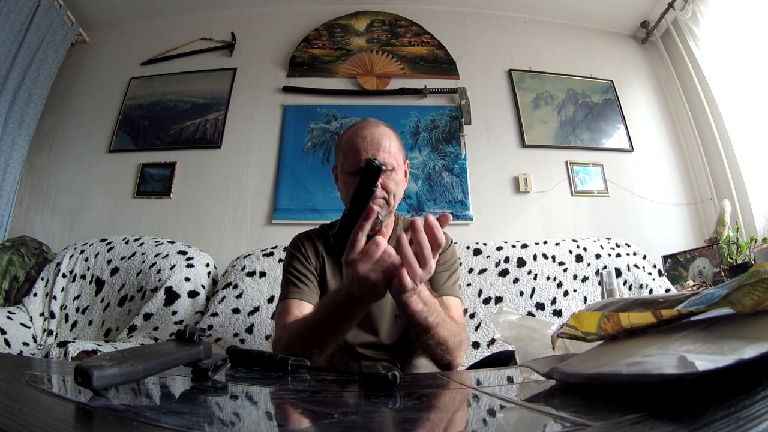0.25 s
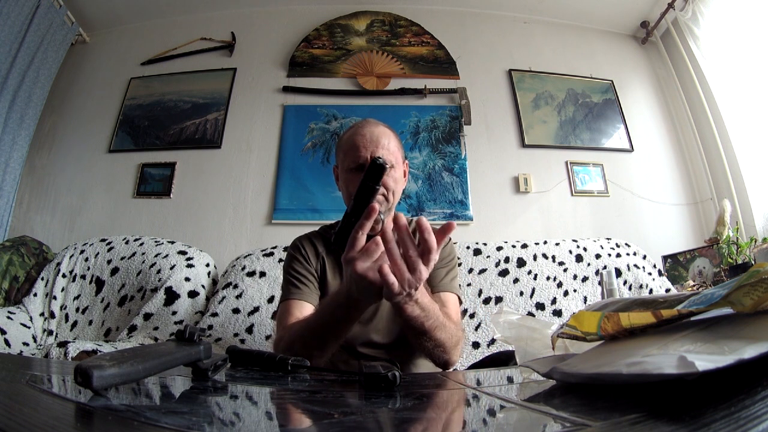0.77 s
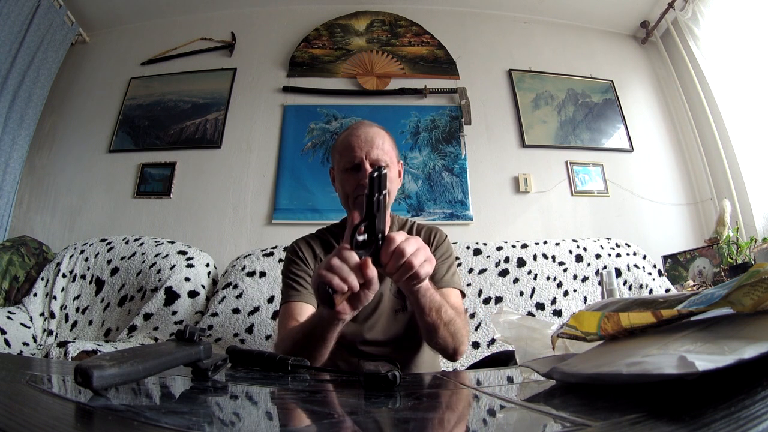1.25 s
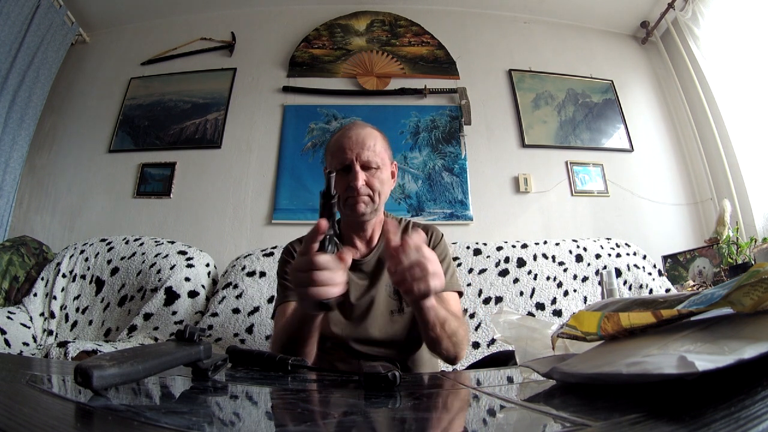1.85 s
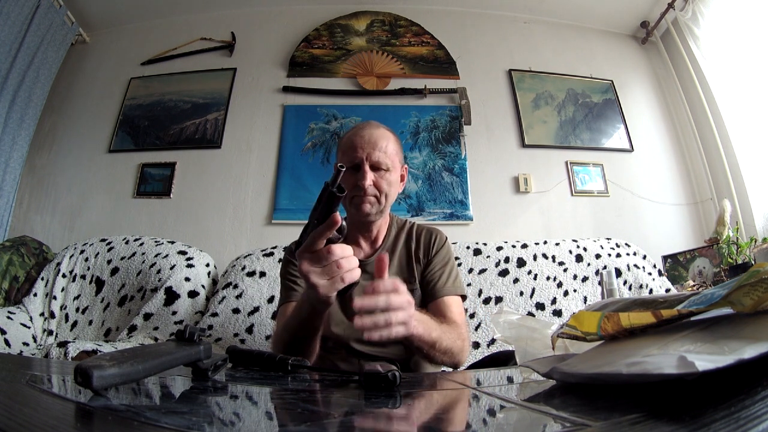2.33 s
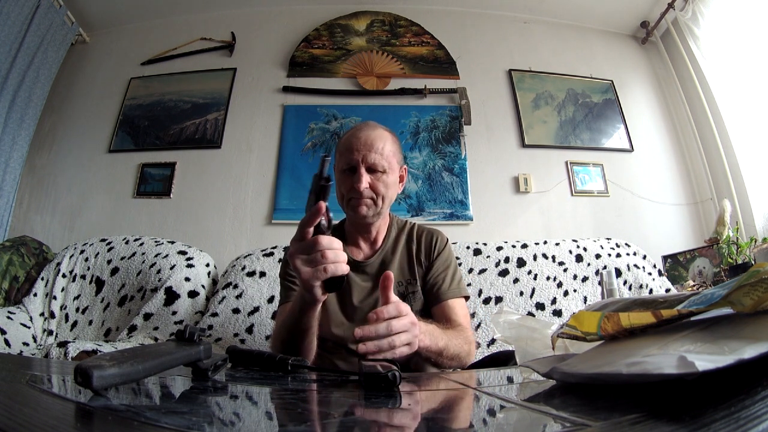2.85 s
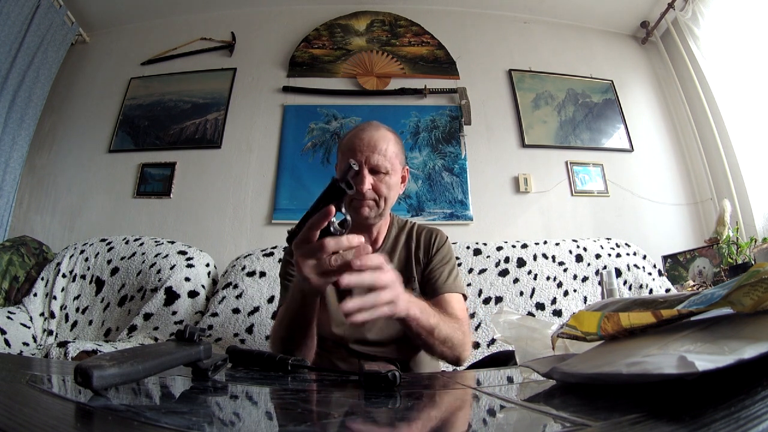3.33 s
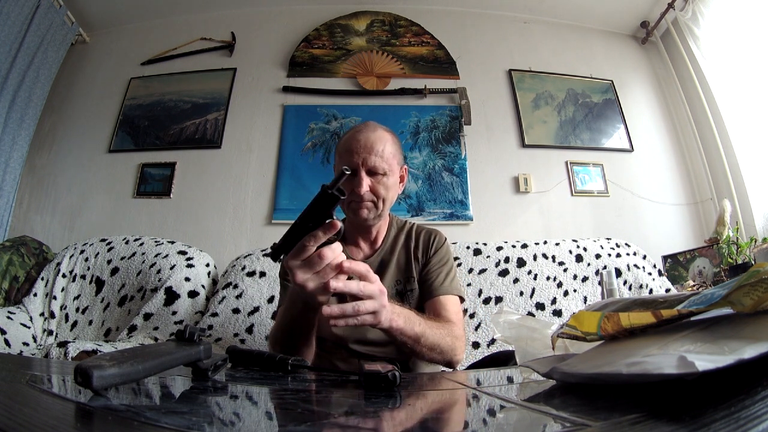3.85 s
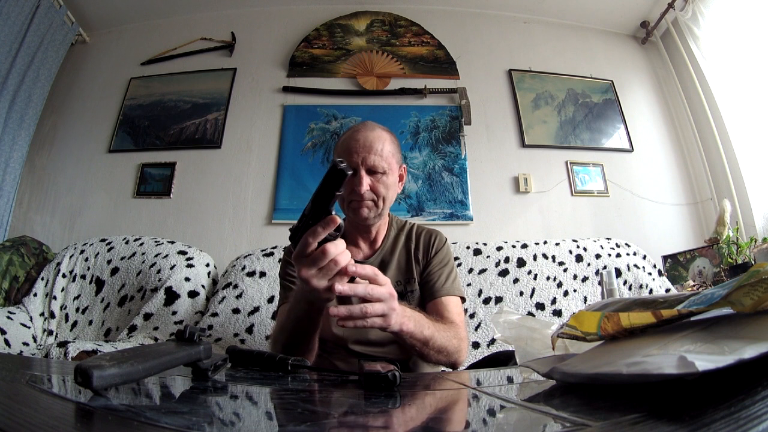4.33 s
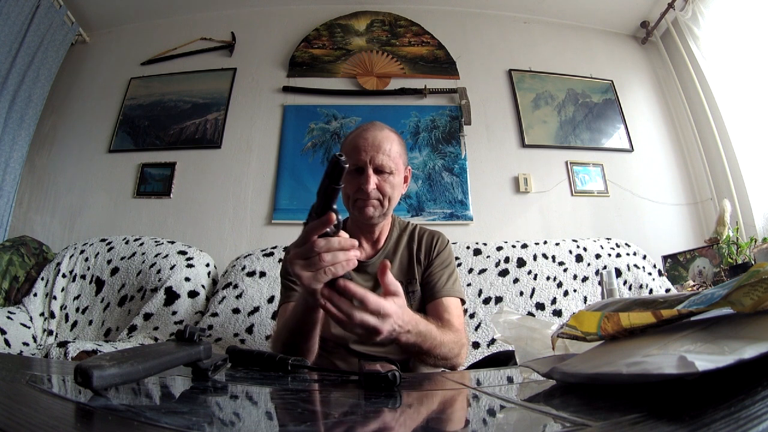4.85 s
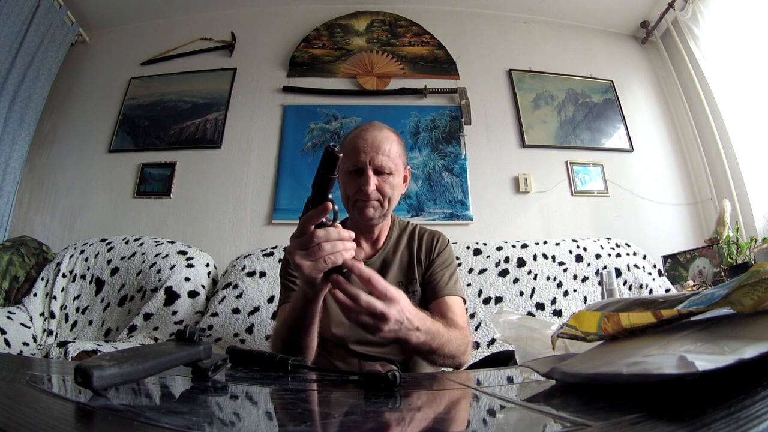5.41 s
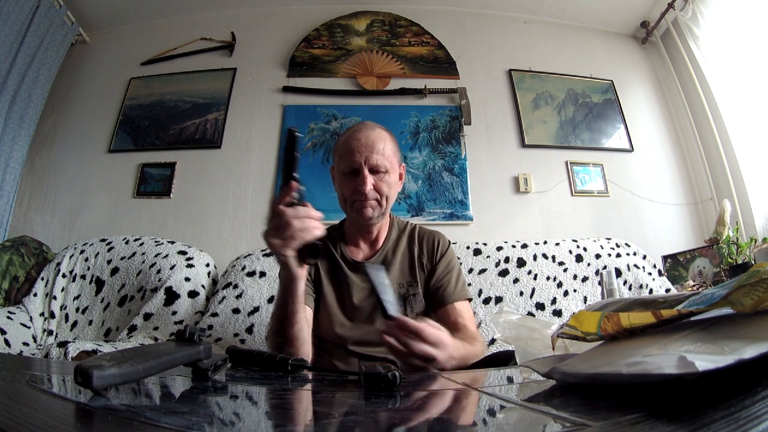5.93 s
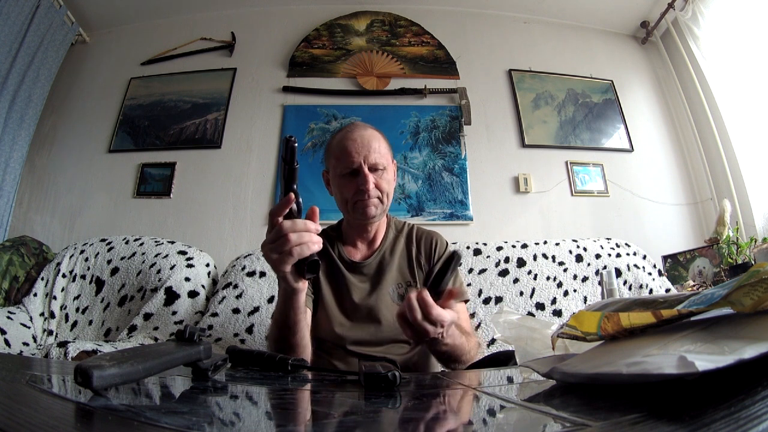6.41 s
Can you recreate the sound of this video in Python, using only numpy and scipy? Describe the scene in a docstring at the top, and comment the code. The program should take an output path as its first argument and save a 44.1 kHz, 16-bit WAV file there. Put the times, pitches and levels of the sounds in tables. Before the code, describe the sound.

Indoors in a furnished room, close to a microphone on a table, low rumble and soft hiss run throughout. Loose metal parts tick at 0.1 seconds, then a pistol slide slams at 0.2 with a bright, very short steel clack. At 0.6 a brief scrape and double click follow, much softer. Sparse faint ticks lead to a cluster at 1.55 to 1.7: scraping, small clicks and a very hard snap that overloads with a dull thump. From about 1.8 to 4 it is nearly quiet, with tiny ticks and a barely audible thin whistle at 3.1. At 4.06 a short scrape runs into another violent, distorted double slam. A light scrape and click come at 5.15. From 5.7 to 6.05 the magazine knocks, slides and clicks softly in its hollow well, then only hiss remains. Loud blows leave a short room tail.

```python
"""Furnished living room; a pistol worked by hand about a metre from a two-port microphone on a table.
Hiss, rumble and a steady offset lie under everything; loose parts tick from the start, as filtered noise and
ringing modes. Slide and action scrape and slam near 0.2, 0.6, 1.6, 4.1 and 5.2 s: contacts ring the damped steel.
A faint whistle, a plain sine, comes at 3.1 s; from 5.7 s the magazine knocks and scrapes in its hollow well.
Echoes and a diffuse tail answer each sound; the hardest blows overload the input, with clipping and a thump."""
import sys
import numpy as np
from scipy import signal
from scipy.io import wavfile

SR = 44100
rng = np.random.default_rng(int(sys.argv[2]) if len(sys.argv) > 2 else 0)


def output_pcm(signal):
    """Save a mono or channel-first signal as 16-bit PCM at the path in sys.argv[1].

    Samples are clipped to [-1, 1] before scaling.
    """
    pcm = np.clip(np.atleast_2d(signal).T, -1, 1) * 32767
    wavfile.write(sys.argv[1], SR, np.round(pcm).astype(np.int16))


N = 294091

# Background spectrum, only its shape: [f/Hz, relative density level/dB]
HISS_SPECTRUM = [(18, -32.5), (30, 1.5), (32, -4.5), (53, 0.5), (224, -3.5), (307, -5), (341, -5.5),
                 (638, -10), (2480, -20.5), (2980, -14), (3680, -23.5), (14300, -27.5), (15500, -37)]
# Difference between the ports in that background: [f/Hz, side relative to mid level/dB]
HISS_SIDE_LEVELS = [(60, -3.5), (130, -19.5), (290, -20), (640, -17.5), (1410, -14), (3100, -4.5),
                    (6820, -1), (15000, -2.5)]
# Loose parts tick as the hands shift the pistol: [t/s, middle-mode peak level/dB, strongest ring f/Hz]
LOOSE_TICKS = [(.090, -26.5, 2354), (0.133, -30.5, 3276), (0.449, -38, 1510), (1.016, -35.5, 1880),
               (1.233, -49.5, 2083), (1.289, -46, 2197), (1.501, -33, 2270), (1.535, -42, 2090),
               (1.577, -23, 2230), (1.709, -25.5, 2690), (2.815, -49.5, 2580), (2.939, -54, 1800),
               (3.179, -49.5, 1800), (3.199, -50.5, 1860), (3.219, -56.5, 1867), (3.429, -54, 1296),
               (3.614, -48.5, 1300), (3.672, -41.5, 1870), (3.73, -39, 1860), (3.846, -50.5, 1208),
               (5.132, -36, 1462)]
# Parts of the action strike each other: [t/s, middle-mode peak level/dB, strongest ring f/Hz,
# treble relative to middle level/dB, low relative to middle level/dB]
ACTION_BLOWS = [(.159, -23.5, 3270, -23.5, -5), (.179, 0.5, 2280, -28.5, -24), (.185, -8, 2900, -19.5, -25),
                (.192, -12, 3050, -32.5, -26), (.1945, 5, 2470, -18, -15), (.591, -13, 4360, -26, -6.5),
                (.599, -13.5, 2160, -27, -8.5), (1.573, -20.5, 3300, -12, -31),
                (1.584, -15.5, 1960, -12, -21.5), (1.5845, -11, 5550, -16, -42),
                (1.607, -19, 4800, -10, -22), (1.618, -16, 2090, -19, -19), (1.628, 9, 2650, -15.5, -20),
                (1.715, -17, 2090, -25, -11), (1.72, -19.5, 4550, -17, -18), (4.059, -16, 3000, -20, -12),
                (4.0725, -17, 2860, -22, -27.5), (4.0805, 9.5, 1930, -10, -23),
                (4.085, 4.5, 3350, -16, -20), (4.093, -0.5, 3210, -12, -16), (5.159, -28.5, 3400, -6, -38)]
# Modes of slide and frame, damped by the hand: [f/Hz, relative level/dB, t60/s]
STEEL_MODES = [(780, -2, 0.0018), (1080, 0.5, 0.0023), (1330, -11, .008), (1654.5, -7, 0.001),
               (1764, -1, 0.0043), (2126, 3.5, 0.0031), (2866, 2.5, 0.0036), (3277, 0, 0.0041),
               (3440, -4.5, 0.0092), (4130, -7, 0.0042), (4740, -7.5, 0.0033), (5790, -13, 0.008),
               (6600, 0.5, 0.0028), (7130, -1, 0.0033), (7970, -2.5, 0.0024), (9490, -5, 0.0059),
               (10607, 0, 0.002), (12200, -5, 0.0021), (12963, -12, 0.0058)]
# First reflections off table, wall and ceiling: [delay t/ms, energy relative to direct level/dB]
FIRST_ECHOES = [(5.5, -18.5), (11.5, -16), (16.0, -19.5)]
# Diffuse tail of the room: [f/Hz, relative level/dB, t60/s]
ROOM_TAIL = [(300, -9.5, 0.38), (730, -10.5, 0.48), (2030, -1, 0.23), (5530, 0, .23), (12000, 6, .2)]
# Difference between the ports in the tail: [f/Hz, side relative to mid level/dB]
ROOM_SIDE_LEVELS = [(300, -15), (1300, -30), (4400, -17), (8100, -16.5), (15000, -19)]
# Slide along its rails: [start t/s, end t/s, first level/dB, last level/dB, strongest ring f/Hz]
RAIL_SCRAPES = [(0.137, 0.185, -39.5, -34.5, 3300), (.589, .603, -21.5, -26, 2760),
                (1.568, 1.628, -40, -39, 2198), (4.057, 4.071, -21, -27, 2498),
                (4.072, 4.082, -24, -21, 2793), (5.14, 5.16, -55, -33.5, 3390),
                (5.158, 5.17, -35.5, -43.5, 3400)]
# One faint thin whistle: [start t/s, end t/s, f/Hz, rms level/dB]
WHISTLE = (3.065, 3.175, 2900, -73)
# Catch and magazine knock on the well: [t/s, peak level/dB, upper modes' extra level/dB]
WELL_KNOCKS = [(5.718, -27.5, -4), (5.748, -45, -10), (5.784, -47.5, 4), (5.841, -25.5, -12),
               (5.888, -34, -17), (5.9, -30.5, -17), (5.916, -28.5, 7), (5.926, -27, 9), (5.936, -35, -6),
               (5.945, -24, 17), (6.038, -46, -2)]
# Modes of the hollow magazine well: [f/Hz, relative level/dB, t60/s]
WELL_MODES = [(1820, 9, 0.016), (2140, 4.5, 0.0073), (2780, 7, 0.0061), (3410, 8.5, 0.011),
              (4100, -16, 0.0056), (5200, -7, 0.0039), (9770, -18, .004)]
# Level curve of the magazine sliding in its well: [t/s, level/dB]
MAGAZINE_LEVELS = [(5.805, -57), (5.823, -49), (5.836, -53), (5.85, -44.5), (5.88, -52.5), (5.914, -39.5),
                   (5.948, -39.5), (5.96, -72)]
# Constant input offset, left then right: [share of full scale]
INPUT_OFFSET = [
    [-.0175],
    [-.0005],
]
# Thump relative to the overload that causes it, left then right: [level/dB]
THUMP_LEVELS = [
    [-15.5],
    [-16.5],
]

HISS_DB = -59   # rms of the mid signal
HISS_TILT_DB = 0.07   # left raised, right lowered by this

LOW_TOP_HZ, TREBLE_START_HZ = 1200, 5800   # edges of the low, middle and treble mode groups
TICK_TREBLE_DB, TICK_LOW_DB = -25, -12.5   # relative to a tick's middle modes
CONTACT_MS, CONTACT_MS_PER_DB = 2.7, 0.406   # the hardest blows, above 0 dB, rattle on longer
FAVOUR_WIDTH, CHANCE_DB = .16, 1.5   # width in natural log of frequency; random spread of each mode
FAVOUR_DB, FAVOUR_PER_DB = 6.5, 0.24   # a softer blow favours the nearest modes more
DULL_PER_DB = 0.25   # and loses this many dB an octave above them for each dB of softness
AROUND_SHARE = .5   # how much of a blow's own colour survives averaging over directions
SMALL_BODY_HZ = 470   # so small a body sends out little below this

ROOM_DB, ROOM_RISE_S = -7, 0.01   # tail energy relative to direct; time of its gradual build-up
ECHO_SMEAR_MS, ECHO_SIDE_DB = 2.0, -18.5
PORTS_DIFFER_DB, PORTS_DIFFER_HZ = -15.5, [5000, 10000]   # the ports colour the treble a little differently

SCRAPE_LOW_DB, SCRAPE_TREBLE_DB = -11, -19.5   # relative to a scrape's middle modes
KNOCK_MS, KNOCK_AROUND_DB = 3.34, -4.5   # the gripping hand shields the well from the walls
UPPER_WELL_HZ = 2400

INPUT_TOP = .93   # clipping height, share of full scale
THUMP_HZ, CUTOFF_HZ = 450, 15650   # low-pass edges of the thump and of the whole signal
OPPOSITE = np.array([[1], [-1]])   # side signal: plus on the left, minus on the right


def from_db(db):
    """Decibels to gain."""
    return 10 ** (np.asarray(db) / 20)


def rms_one(x):
    """Scale to rms 1."""
    return x / np.sqrt(np.mean(x ** 2) + 1e-20)


def at_hz(rows, hz, column=1):
    """Read a table on a log-frequency axis."""
    table = np.array(rows)
    return np.interp(np.log(hz), np.log(table[:, 0]), table[:, column])


def steep(x, kind, hz):
    """Fourth-order high- or low-pass."""
    return signal.sosfilt(signal.butter(4, hz, kind, fs=SR, output="sos"), x)


def bands(length):
    """Half-octave bands of mid and side noise with their centres; neighbours unrelated."""
    edges = 12 * 2 ** np.arange(0, 10.6, .5)
    white = rng.standard_normal((2, 2, length))
    for k, (low, high) in enumerate(zip(edges, edges[1:])):
        sos = signal.butter(2, [low, high], "band", fs=SR, output="sos")
        mid, side = signal.sosfilt(sos, white[k % 2])
        yield np.sqrt(low * high), mid, side


def hiss():
    """Room rumble shared by both ports, circuit hiss largely own to each: shaped noise bands."""
    run_in = SR // 2   # lets the band filters settle
    mids = sides = 0
    for hz, mid, side in bands(N + run_in):
        level_db = at_hz(HISS_SPECTRUM, hz)
        mids = mids + from_db(level_db) * mid[run_in:]
        sides = sides + from_db(level_db + at_hz(HISS_SIDE_LEVELS, hz)) * side[run_in:]
    scale = from_db(HISS_DB) / np.std(mids)
    return scale * (mids + sides * OPPOSITE) * from_db(HISS_TILT_DB * OPPOSITE)


def grains(shape, per_s):
    """Tiny contacts at random moments, of uneven size and sign."""
    sizes = from_db(2.0 * np.minimum(rng.exponential(1, shape), 4))
    signs = rng.choice([-1, 1], shape)
    return sizes * signs * (rng.random(shape) < per_s / SR)


def rattles(count, contact_ms, first_touch):
    """One burst of contacts a row, thinning out in strength after an added first touch."""
    t = np.arange(2000) / SR
    force = grains((count, len(t)), 20000) * np.exp(-(1000 * t / contact_ms) ** 2)
    force[:, 0] += first_touch
    return force


def ring(force, hz, t60):
    """One damped mode; a unit click sets a sine of starting height 1 ringing."""
    r = from_db(-60 / (t60 * SR))
    w = 2 * np.pi * hz / SR
    return signal.lfilter([0, np.sin(w)], [1, -2 * r * np.cos(w), r * r], force + 1e-18)


def steel(force, strength_db):
    """Ring every steel mode with its strength; give the low, middle and treble modes apart."""
    groups = np.zeros((3, *force.shape))
    signs = (-1) ** np.arange(len(STEEL_MODES))   # neighbouring modes move in opposite senses
    for (hz, level_db, t60), extra_db, sign in zip(STEEL_MODES, strength_db, signs):
        group = (hz > LOW_TOP_HZ) + (hz > TREBLE_START_HZ)
        groups[group] += sign * from_db(level_db + extra_db) * ring(force, hz, t60)
    low, middle, treble = groups
    middle = steep(steep(middle, "low", TREBLE_START_HZ), "high", LOW_TOP_HZ)
    return steep(low, "low", LOW_TOP_HZ), middle, steep(treble, "high", TREBLE_START_HZ)


def place(strikes, times):
    """Lay each row of short sounds at its time in seconds; the last axes are (row, sample)."""
    length = strikes.shape[-1]
    out = np.zeros((*strikes.shape[:-2], N + length))
    for k, at in enumerate(np.round(times * SR).astype(int)):
        out[..., at:at + length] += strikes[..., k, :]
    return out[..., :N]


def blows():
    """Each blow or tick is a short rattle of contacts; where it lands decides which modes it favours.
    Gives the sound towards the microphone and the smoother one averaged over all directions."""
    rows = ACTION_BLOWS + [(*tick, TICK_TREBLE_DB, TICK_LOW_DB) for tick in LOOSE_TICKS]
    s, peak_db, ring_hz, treble_db, low_db = np.transpose(rows)[:, :, None]
    contact_ms = CONTACT_MS + CONTACT_MS_PER_DB * np.maximum(peak_db, 0)
    rattle = rattles(len(s), contact_ms, 6.0)
    click = np.zeros_like(rattle)
    click[:, 0] = 1

    chance = rng.standard_normal((len(s), len(STEEL_MODES)))
    softness_db = np.maximum(-peak_db, 0)
    strength_db = []
    for k, (hz, *_) in enumerate(STEEL_MODES):
        nearness = np.exp(-(np.log(hz / ring_hz) / FAVOUR_WIDTH) ** 2)
        favour_db = (FAVOUR_DB + FAVOUR_PER_DB * softness_db) * nearness
        octaves_above = np.maximum(np.log2(hz / ring_hz), 0)
        dull_db = DULL_PER_DB * softness_db * octaves_above
        strength_db.append(favour_db - dull_db + CHANCE_DB * chance[:, [k]])

    ahead_groups = steel(rattle, strength_db)
    around_groups = steel(click, AROUND_SHARE * np.array(strength_db))
    strikes = np.zeros((2, *rattle.shape))
    for ahead, around, group_db in zip(ahead_groups, around_groups, [low_db, 0, treble_db]):
        ahead = from_db(peak_db + group_db) * ahead / np.abs(ahead).max(axis=1, keepdims=True)
        strikes[0] += ahead
        strikes[1] += around * (ahead.std(axis=1) / around.std(axis=1))[:, None]   # same energy
    return place(strikes, s[:, 0])


def room(ahead, around):
    """Direct sound, three smeared echoes and a diffuse tail dying band by band; close ports hear it almost alike."""
    t = np.arange(SR // 2) / SR
    tail = 0
    for hz, mid, side in bands(len(t)):
        decay = from_db(at_hz(ROOM_TAIL, hz) - 60 * t / at_hz(ROOM_TAIL, hz, column=2))
        tail = tail + decay * (mid + from_db(at_hz(ROOM_SIDE_LEVELS, hz)) * side * OPPOSITE)
    tail *= 1 - np.exp(-(t / ROOM_RISE_S) ** 2)
    response = from_db(ROOM_DB) * tail / np.sqrt(np.sum(tail ** 2) / 2)

    for ms, level_db in FIRST_ECHOES:
        mid, side = rng.standard_normal((2, 400)) * np.exp(-1000 * t[:400] / ECHO_SMEAR_MS)
        at = round(ms * SR / 1000)
        echo = mid + from_db(ECHO_SIDE_DB) * side * OPPOSITE
        response[:, at:at + 400] += from_db(level_db) * echo / np.sqrt(np.sum(mid ** 2))

    unlike = signal.sosfilt(signal.butter(2, PORTS_DIFFER_HZ, "band", fs=SR, output="sos"), ahead)
    direct = ahead + from_db(PORTS_DIFFER_DB) * unlike * OPPOSITE
    return direct + signal.fftconvolve(around[None], response, axes=1)[:, :N]


def stroke(rows, body):
    """Dense contacts ring a body under a level curve of (t/s, level/dB)."""
    s, level_db = np.transpose(rows)
    start, end = round(s[0] * SR), round(s[-1] * SR)
    t = np.arange(start, end) / SR
    level = from_db(np.interp(t, s, level_db))
    fade = signal.windows.tukey(end - start, .1)
    out = np.zeros(N)
    out[start:end] = level * body(grains(end - start, 6000)) * fade
    return out


def rails(force, ring_hz):
    """The steel, rubbed; the modes near the rubbed spot's strongest ring lead."""
    mode_hz = np.array(STEEL_MODES)[:, 0]
    strength_db = FAVOUR_DB * np.exp(-(np.log(mode_hz / ring_hz) / FAVOUR_WIDTH) ** 2)
    low, middle, treble = map(rms_one, steel(force, strength_db))
    return middle + from_db(SCRAPE_LOW_DB) * low + from_db(SCRAPE_TREBLE_DB) * treble


def slide_scrapes():
    """The slide rubs along its rails: dense contacts keep the steel ringing."""
    out = np.zeros(N)
    for start, end, first_db, last_db, ring_hz in RAIL_SCRAPES:
        out += stroke([(start, first_db), (end, last_db)], lambda force: rails(force, ring_hz))
    return out


def squeak():
    """A narrow steady tone that fades in and out."""
    start, end, hz, level_db = WHISTLE
    span = slice(round(start * SR), round(end * SR))
    tone = np.sqrt(2) * np.sin(2 * np.pi * hz * np.arange(N)[span] / SR)
    out = np.zeros(N)
    out[span] = from_db(level_db) * tone * signal.windows.tukey(len(tone), .3)
    return out


def well(force, upper_db=0):
    """The hollow well, rubbed or knocked: its damped modes ring together."""
    modes = 0
    for hz, level_db, t60 in WELL_MODES:
        modes = modes + from_db(level_db + upper_db * (hz > UPPER_WELL_HZ)) * ring(force, hz, t60)
    return rms_one(steep(steep(modes, "low", 11000), "high", 1150))


def knocks():
    """A short rattle of contacts rings the well; towards the microphone and around."""
    s, peak_db, upper_db = np.transpose(WELL_KNOCKS)[:, :, None]
    rings = well(rattles(len(s), KNOCK_MS, 3.0), upper_db)
    rings = from_db(peak_db) * rings / np.abs(rings).max(axis=1, keepdims=True)
    return place(rings, s[:, 0]) * from_db([[0], [KNOCK_AROUND_DB]])


def magazine_scrape():
    """The magazine rubs out of its well: dense contacts ring the hollow."""
    return stroke(MAGAZINE_LEVELS, well)


def scene():
    """Pistol and whistle in the room, over the hiss."""
    pistol = blows() + slide_scrapes() + knocks() + magazine_scrape()
    ahead, around = steep(pistol, "high", SMALL_BODY_HZ) + squeak()
    return room(ahead, around) + hiss()


def record(dry):
    """An overdriven input clips and shifts its rest point (a low thump); an offset is added; the top is cut."""
    overload = np.maximum(np.abs(dry) - INPUT_TOP, 0)
    thump = from_db(THUMP_LEVELS) * steep(overload, "low", THUMP_HZ)
    clipped = np.clip(dry + INPUT_OFFSET, -INPUT_TOP, INPUT_TOP) + thump
    top_cut = signal.cheby2(14, 50, CUTOFF_HZ, fs=SR, output="sos")
    return np.clip(signal.sosfilt(top_cut, clipped), -1, 1)


dry = scene()
out = record(dry)
output_pcm(out)
```